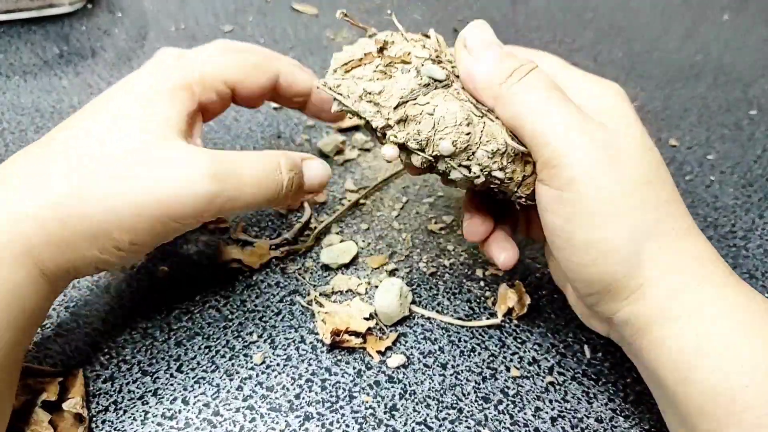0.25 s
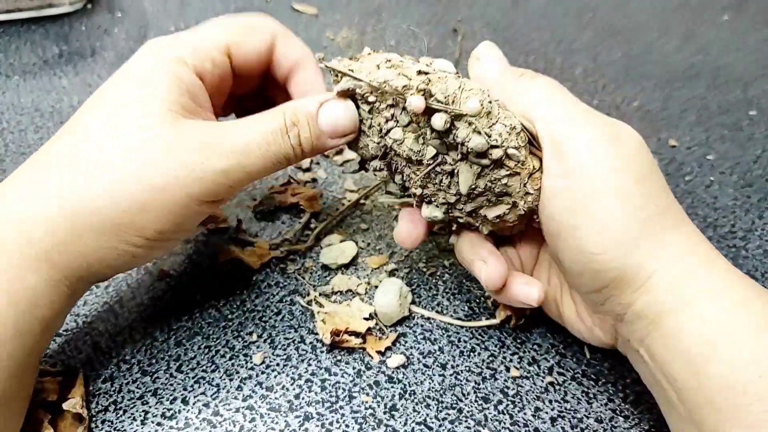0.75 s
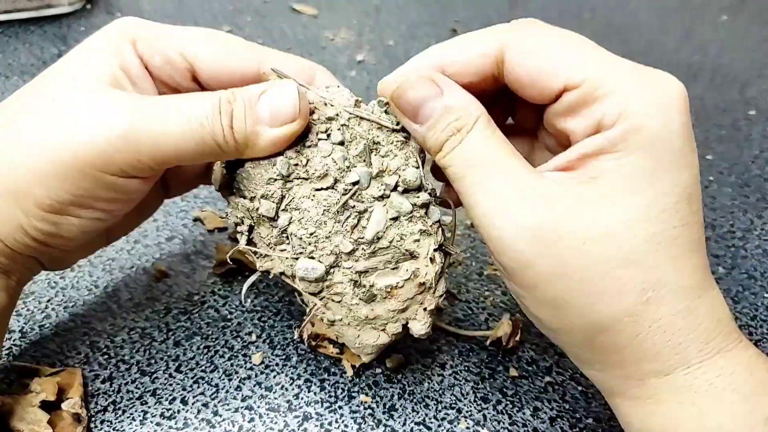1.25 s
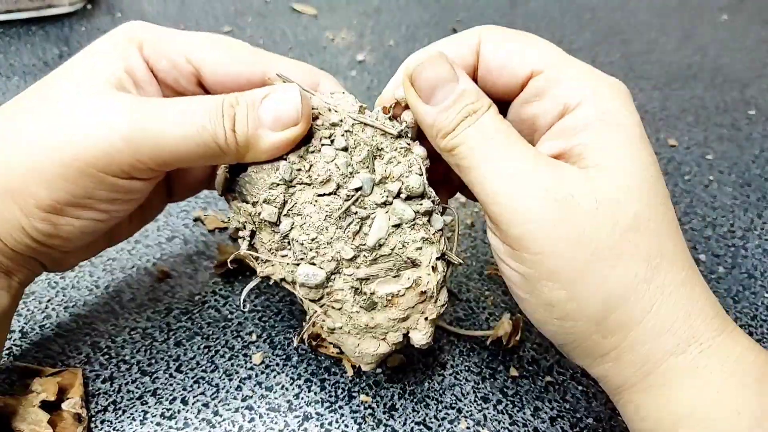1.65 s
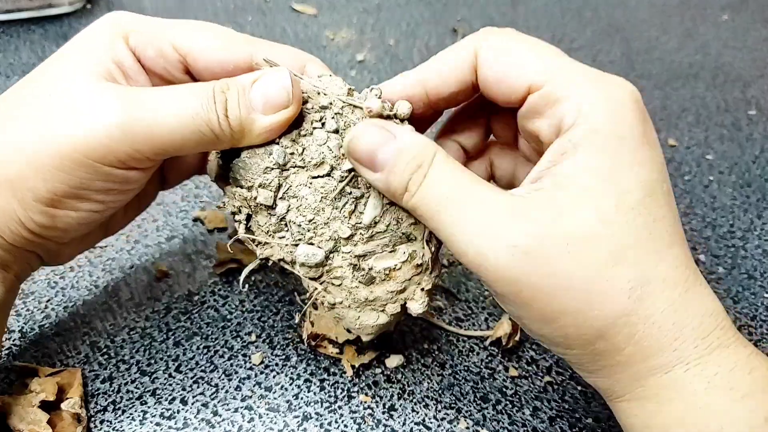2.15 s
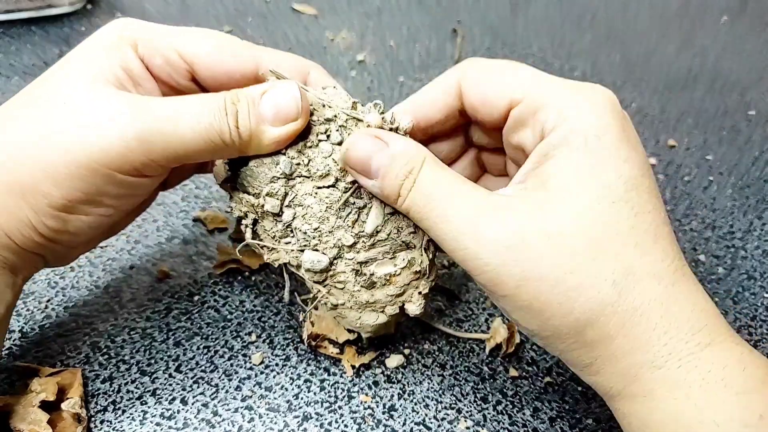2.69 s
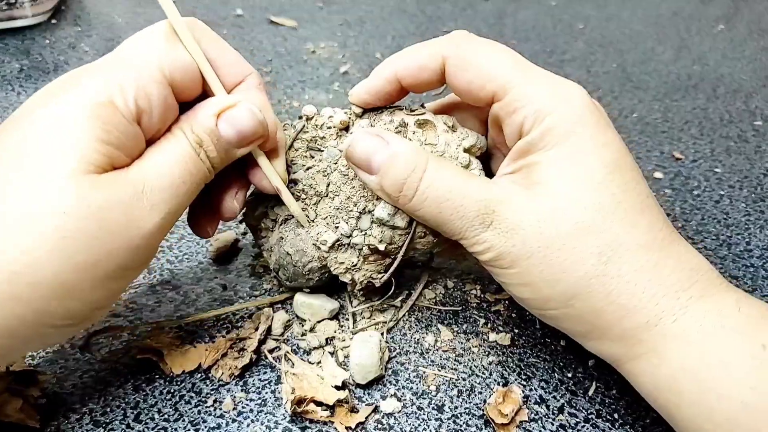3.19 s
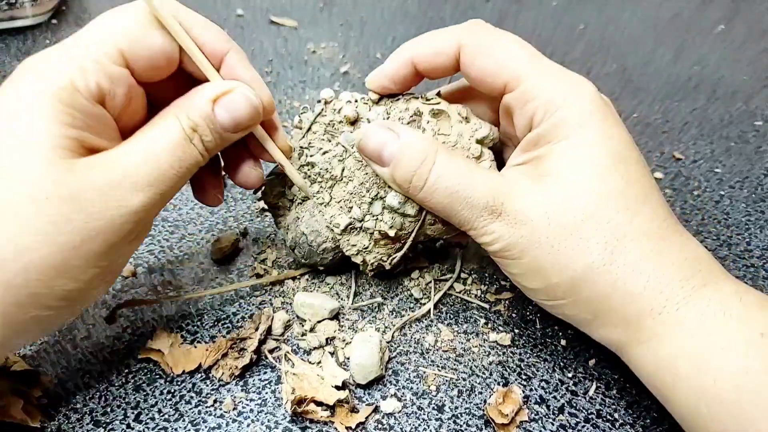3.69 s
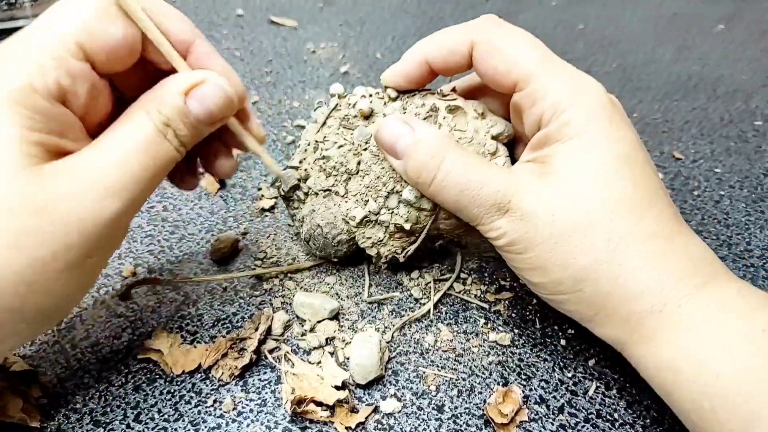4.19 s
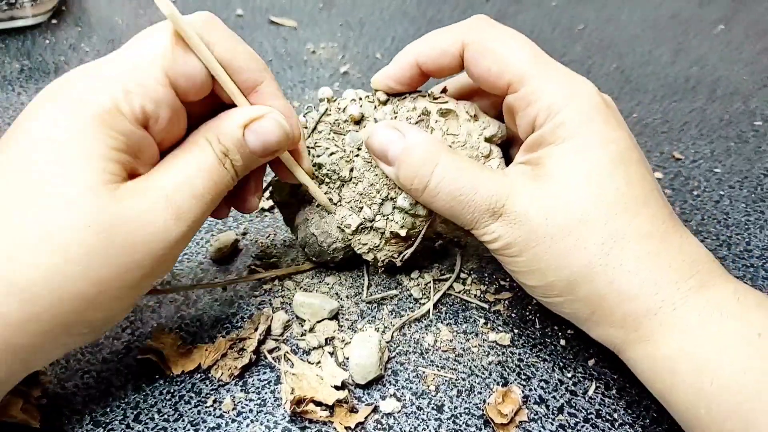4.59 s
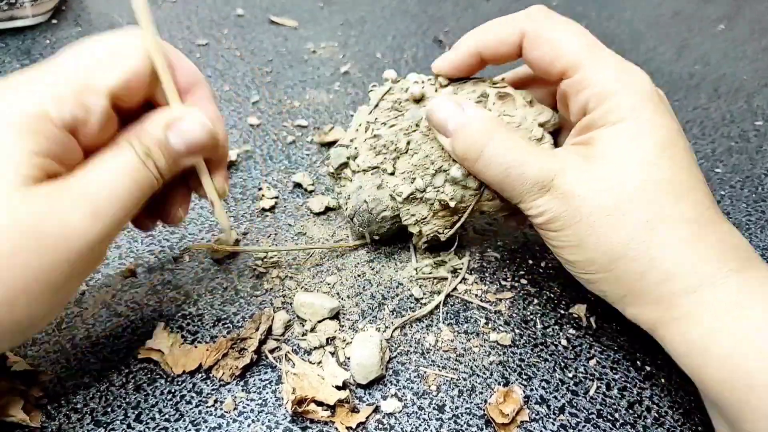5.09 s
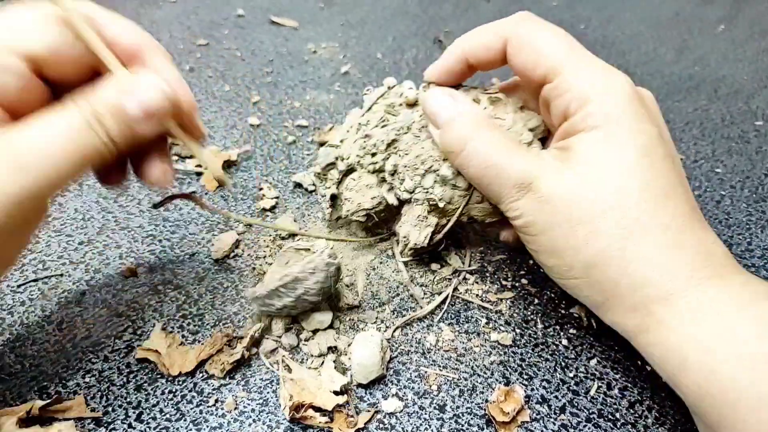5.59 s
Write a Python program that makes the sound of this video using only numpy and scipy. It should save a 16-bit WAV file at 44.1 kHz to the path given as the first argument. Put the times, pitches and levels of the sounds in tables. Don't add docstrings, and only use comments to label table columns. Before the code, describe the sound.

A close stereo phone microphone hears a dried mud lump handled over a table in a quiet, nearly dry room with faint hiss. From 0 to 1.2 s fingertips pick flakes: small, bright, irregular ticks, soft gritty rubbing and a slightly duller crackle near 0.5 s. It is then almost silent, with faint clicks at 1.9 and 2.3 s. At 2.53 s a piece snaps off sharply, crackling and trickling crumbs until 2.9 s, when the sound mutes briefly. A stick pokes from 3.0 s, lightly scraping, with hard cracks and table knocks at 3.33 and, strongest, 4.06 s; weaker pokes follow. A loud bright crack comes at 5.05 s, cut by a short mute at 5.15 s. Around 5.5 s the lump crunches apart in a dense gritty burst with crumbs pouring. After another tiny mute, a loud, slightly clipped low thump hits at 5.73 s, followed by final small cracks and crumbs.

```python
import sys
import numpy as np
from scipy import signal
from scipy.fft import rfft, irfft, next_fast_len
from scipy.io import wavfile
from scipy.ndimage import uniform_filter1d, map_coordinates

SR = 44100
rng = np.random.default_rng(int(sys.argv[2]) if len(sys.argv) > 2 else 0)


def attenuation_scalar(level_db):
    decades = np.asarray(level_db, float) / 20
    return 10 ** decades


def output_pcm(signal):
    pcm = np.clip(np.atleast_2d(signal).T, -1, 1) * 32767
    wavfile.write(sys.argv[1], SR, np.round(pcm).astype(np.int16))


N = 257984

# frequency in Hz, density in dB per Hz.
ROOM_TONE = [(15, -72), (25, -34), (120, -5), (157, -12), (223, -7), (344, -12), (796, -22), (988, -24.5),
             (1480, -23.5), (1940, -30), (5140, -34), (8360, -41), (11300, -38), (16000, -36)]

# peak time in seconds, level in dB, rise and fall in seconds
# per 20 dB, brightness in dB.
RUBS = [(0.074, -58, 0.2, 0.08, 8), (0.2, -58, 0.03, 0.01, 7.5), (0.312, -65.5, 0.37, 0.7, -10.5),
        (0.522, -53.5, -0.07, 0.14, -20), (0.626, -63.5, -0.5, 0.4, -3), (0.81, -65, 1, 0.1, 9),
        (0.915, -52, 0.06, 0.04, -0.5), (1.025, -64, 0, -0.32, 13), (1.19, -68, 1.1, 0.56, 5.5),
        (1.272, -71, .035, 0.5, -1.5), (1.87, -77, 5, -1.5, -12), (1.903, -69.5, 0.15, 0.18, -5.5),
        (2.14, -75, .45, -0.14, -9), (2.295, -54.5, 0.06, 0.03, 4), (2.485, -68, 0.8, 0.6, 0)]
FALLOUT = [
    (2.538, -42, -0.0067, 0.11, -8),
    (2.61, -50.5, 0.0134, 0.02, -20),
    (2.649, -58, 0.01, 0.02, -10),
    (2.735, -58.5, 0.15, 0.2, -7),
    (2.879, -60, -0.27, 0.08, 2.5),
]
SHOWERS = [(3.008, -55, -0.02, -0.1, 1), (3.228, -58.5, 0.2179, 0.14, 2.5), (3.339, -45, -0.02, 0.3, 2),
           (3.409, -50, 0.07, 0.4, -3.5), (3.51, -56, .05, .1, 3), (3.56, -57, 0.2, .03, -5),
           (3.68, -57.5, 0.4, -0.46, -5), (3.895, -70, .01, .02, 2), (3.985, -52, -0.08, 0.03, -13.5),
           (4.05, -72, -1, -0.2, 1.5), (4.072, -52.5, -0.24, 0.16, 4.5), (4.2, -56, 0.19, 0.0759, -19),
           (4.395, -64, -0.02, 0.07, 3), (4.462, -70.5, -0.13, 0, 5), (4.678, -58.5, 0.18, 0.33, -1),
           (5.054, -47.5, -0.0634, 4, -3), (5.1, -55.5, 0.16, 7.5, 4.5), (5.18, -46.5, -3, 0.05, -2.5),
           (5.359, -59, 1.2, 0.07, -8.5), (5.401, -69.5, -6, 0, 0), (5.498, -40.5, .004, 0.22, 3),
           (5.54, -33, 0.03, 0.08, -1), (5.63, -60, 0.2, 4, 4), (5.75, -66, 13, -6, -22.5),
           (5.801, -47, 0.4, .09, -8)]
# frequency in Hz, gain in dB.
FIZZ_COLOUR = [(4000, -38), (5800, -4.5), (7500, -8.5), (9300, -10), (11000, -10), (12000, -3),
               (15400, -9.5), (15900, -69)]
# frequency in Hz, gain in dB.
GRIT_COLOUR = [(1500, -20), (2400, 2), (3600, 1.5), (5000, 0.5), (6500, -22)]
# frequency in Hz, gain in dB.
RUB_COLOUR = [(250, -9), (600, -2.5), (1200, -2), (2000, -2.5), (3500, -36.5)]
DULL_PER_BRIGHT = -0.231
FINGER_DULL_DB, STICK_DULL_DB = -3, 0.4
SHOT_ENDS = [
    1.222,
    2.926,
    5.157,
    5.72,
    9,
]

# start in seconds,
# peak in dB, pitch in Hz, decay t60 in seconds, left re right in dB.
CHIPS = [(.0735, -54, 6860, 0.014, -2), (.1455, -44, 7240, .006, 1), (.154, -52, 7000, .008, 0),
         (0.1987, -37, 4100, 0.01, 0), (.2329, -41, 4510, 0.0083, 0), (0.3315, -39, 1360, 0.0168, -7),
         (.338, -41, 7530, .012, 0), (.356, -50, 7800, .008, -0.5), (.5217, -42, 4760, 0.025, -10),
         (.531, -44, 4900, 0.032, -7.5), (0.545, -33.5, 1598, .012, -15), (.5447, -38, 4830, .01, -8),
         (.6488, -42.5, 3900, 0.0064, -2), (0.7027, -36, 3250, .006, -9.5), (0.7033, -47, 1500, 0.0072, 0),
         (.7597, -48, 5940, 0.0043, -3.5), (.833, -48.5, 1110, 0.032, -3), (0.9153, -46.5, 5770, 0.0046, 4),
         (.9165, -40.5, 2000, .008, 3), (2.592, -36, 1660, 0.023, 0), (2.6068, -34.5, 1660, .02, 0),
         (2.6425, -40.5, 1630, 0.022, 2), (2.672, -38, 1630, 0.011, -2.5), (2.695, -40.5, 1600, 0.017, 3),
         (3.327, -20.5, 3365, 0.007, 5), (3.372, -36, 1290, .02, 2), (3.453, -36, 1191, 0.039, 0),
         (4.0593, -8.5, 1240, 0.0089, 0.5), (4.07, -28, 1000, 0.026, -2), (4.093, -30, 890, 0.029, 1),
         (5.0459, -13.5, 6500, 0.0038, -10), (5.088, -30, 916, 0.044, 1), (5.361, -38, 950, 0.037, 0),
         (5.504, -25, 1020, 0.014, 0), (5.554, -22, 4273, 0.013, -4.5), (5.577, -25.5, 3400, .01, -2),
         (5.595, -39, 6470, 0.0118, -3.5), (5.611, -41.5, 6730, 0.0084, -2),
         (5.6115, -36, 4000, 0.0087, -8), (5.675, -34, 583, 0.062, 2.5),
         (.0335, -44, 6100, 0.0035, 0), (.041, -45, 8500, .004, 5), (.1628, -45, 6300, .006, 0),
         (.171, -49, 7550, .005, 0), (.184, -46, 5900, .005, -3), (.191, -47, 7500, .005, 0),
         (.297, -50, 6500, 0.0045, 0), (.366, -44, 8100, .005, -2.5), (.4672, -43, 2060, 0.0065, -2),
         (0.517, -38, 4400, .004, -8), (.518, -43, 900, 0.007, -3), (.635, -52, 7300, 0.0045, 0),
         (.6492, -41.5, 7420, 0.0038, -4), (.749, -48, 4500, .004, 0), (0.91, -44, 6500, .004, 0),
         (2.593, -34, 4500, .004, 0), (2.607, -36, 5200, .006, -4), (2.643, -40.5, 4020, .005, 0),
         (2.695, -42, 3200, .006, 0), (2.744, -37, 3500, .005, 6), (3.358, -40, 6550, 0.0041, -5),
         (3.37, -39, 7250, 0.0043, 0), (3.39, -36.5, 6300, .006, 0), (3.505, -39, 7260, 0.0053, -2),
         (3.56, -39, 4300, .008, 0.5), (5.493, -24, 7500, 0.0038, -4), (5.528, -24, 5000, .005, -2),
         (5.561, -24, 3270, .006, 0), (5.669, -37, 4840, .01, -8), (2.672, -34, 3000, .004, 0),
         (2.8382, -37, 4300, .005, -6), (2.8768, -36, 7400, .005, 0), (3.6105, -32, 7000, .005, -6),
         (5.535, -17, 4300, .005, -4), (5.81, -36, 5500, .006, 0), (.522, -40, 450, .03, 0),
         (.546, -38, 400, .03, 0), (5.565, -24, 560, .05, 0)]
CHIP_RISE_CYCLES = 0.36

# break time in seconds, peak in dB,
# colour in Hz, left re right in dB.
PICKS = [(0.034, -40, 7000, -17), (0.049, -30.5, 8400, -7), (0.1454, -33, 7530, -11.5),
         (0.1626, -36.5, 7270, 3.5), (0.184, -41, 6760, 3), (0.1975, -25, 8510, -8),
         (0.2333, -28.5, 7400, -4.5), (0.3044, -32.5, 7700, 2), (0.3313, -27.5, 7900, -23),
         (0.3658, -40, 7430, -15.5), (0.418, -35, 5930, 2), (0.4666, -43, 2060, -1.5),
         (0.517, -41, 4500, -11), (0.544, -41, 4450, 1), (0.635, -38, 6840, -13), (0.6494, -40, 7250, -19),
         (0.7596, -40, 6490, -1), (0.7936, -35.5, 8050, -13.5), (0.8827, -28.5, 8100, -5.5),
         (0.9154, -31, 5700, -6.5), (1.019, -41.5, 6740, -21.5), (1.0982, -46, 7040, -15),
         (1.1548, -34.5, 7500, -9), (1.2032, -44, 7600, -9.5), (1.274, -43, 3050, -18),
         (1.9002, -39, 8100, -7), (2.2906, -28, 2330, -8), (2.3979, -44.5, 7750, 4), (2.433, -38, 7500, 5),
         (2.4777, -34, 7400, 4)]
PICK_KNOCK_DB, KNOCK_DB_PER_OCTAVE = -27.5, -1.5
# break time in seconds, peak in dB,
# colour in Hz, left re right in dB, body knock re peak in dB.
BREAK = [(2.528, -12, 5970, 8, -18.5), (2.593, -31, 2480, 11.5, -15), (2.605, -30, 3050, 2, -22),
         (2.644, -48, 4450, -4, -15), (2.674, -30, 2320, 5, -20), (2.695, -48, 2000, -7, 1),
         (2.72, -20.5, 3000, -7, -27.5), (2.743, -34.5, 2350, 10, -19), (2.788, -38.5, 3440, -17.5, -38),
         (2.838, -33.5, 4360, -21, -48), (2.8763, -30, 7400, 4, -42)]
POKES = [(3.0021, -25.5, 4680, -2, -13.5), (3.0746, -30.5, 4370, -2, -15.5), (3.15, -43, 4660, 10, -5.5),
         (3.218, -34, 7580, -16.5, -22), (3.3278, -13.5, 6500, 10.5, -8.5), (3.611, -24.5, 6600, -9, -26),
         (3.6631, -44, 3600, -1, -18), (3.681, -37, 4020, -9.5, -22), (3.893, -44, 6400, -10, -24),
         (3.976, -25.5, 3680, -12.5, -10.5), (4.036, -28, 4630, -8, -15), (4.0596, -12.5, 7150, -0.5, -7.5),
         (4.1469, -34.5, 6860, -10, -10), (4.1792, -36, 2450, 6, -9.5), (4.21, -36.5, 2070, -8, -22),
         (4.392, -43, 4620, -13.5, -8), (4.4576, -38, 4940, -21, -16.5), (4.5475, -47.5, 4400, 10, 5),
         (4.665, -32.5, 5240, -5.5, -7), (4.82, -42.5, 5363, 10, -19)]
LEVERS = [(5.0457, -6, 6760, -3.5, -22), (5.1687, -14.5, 7400, -5, -18), (5.339, -38.5, 4276, -1.5, -9),
          (5.493, -15.5, 6570, -5, -17.5), (5.504, -25.5, 6200, -8, 1), (5.516, -19.5, 7160, 9, -16),
          (5.5325, -11.5, 4800, 3, -22), (5.5596, -15, 4440, -8.5, -15.5), (5.669, -33, 4870, -9, -9),
          (5.7617, -21, 2300, -24, -21), (5.793, -21.5, 5940, 3, -18.5)]
PICK_T60, BREAK_T60, POKE_T60, LEVER_T60 = 0.021, 0.024, 0.015, 0.017
PICK_TEAR, BREAK_TEAR, POKE_TEAR, LEVER_TEAR = 0.33, 0.089, 0.14, 0.06
# frequency in Hz, gain in dB.
CRUST_COLOUR = [(150, -24.5), (1200, -3.5), (2500, 1), (4500, -0.5), (7500, -8), (9500, -10), (11000, -10),
                (12500, -1), (15400, -9), (16900, -45)]

# start in seconds, peak in dB, deep modes re peak in dB,
# long middle mode re peak in dB.
KNOCKS = [(0.068, -39.5, -19.5, -33), (0.417, -45, -21, -18.5), (0.537, -44.5, -16, -12.5),
          (1.266, -53.5, 3.5, -11), (2.527, -30, -33, -22), (3.072, -37, -19, -18.5), (3.15, -38, -11, -14),
          (3.325, -21, -6.5, -25.5), (3.672, -36.5, -9.5, -20.5), (3.969, -33, -21, -20.5),
          (4.033, -32.5, -21.5, -21), (4.06, -15, -2.5, -16.5), (4.089, -18.5, 3.5, -12.5),
          (4.393, -38.5, 2.5, -22), (4.55, -44.5, 3.5, -10.5), (4.668, -34, -7.5, -13.5),
          (4.832, -39.5, -18, -16), (4.986, -43, -20.5, -18), (5.048, -19.5, -3.5, -13),
          (5.085, -22, -18, -13), (5.169, -24, -20.5, -13), (5.352, -36, -42, -12),
          (5.503, -18.5, -30.5, -13), (5.529, -24.5, -22, -4.5), (5.563, -20, -34.5, -17),
          (5.668, -32, -20, -19), (5.7267, -3.6, -4, -26.5), (5.738, -11.1, -9, -24),
          (5.795, -24, 1.5, -10)]
# peak time in seconds, upper modes in dB, rise and fall in seconds
# per 20 dB, deep modes re upper in dB.
PUSHES = [(3.21, -52.5, 0.32, .07, -3.5), (3.352, -42, 0.08, 0.35, -8), (3.48, -56, -0.7, 0.6, -3),
          (3.99, -50, 0.19, -0.43, -2), (4.102, -39, 0.07, 0.085, 16), (4.7, -49, 0.24, 0.36, -1.5),
          (4.841, -45, .04, 0.09, -15.5), (5.365, -47.5, .06, -0.05, -12), (5.19, -40.5, 2.5, 0.1, -26.5),
          (5.4, -57, 0, -0.5, 2), (5.524, -25, 0.025, 0.1, 1), (5.585, -36, .03, .06, -4),
          (3.9, -58, .1, .08, 8), (5.69, -41.5, -0.56, 5, -3)]
# frequency in Hz, level in dB, decay t60 in seconds.
DEEP_MODES = [(130.8, 1, 0.2), (186.8, 0, 0.13)]
# frequency in Hz, level in dB, decay t60 in seconds.
MIDDLE_MODE = [(288.6, -1.5, 0.5)]
# frequency in Hz, level in dB, decay t60 in seconds.
UPPER_MODES = [(417.7, -2, 0.16), (437.7, -2.5, 0.13), (568, -9, 0.12), (888, -14, 0.066)]

# frequency in Hz, decay t60 in seconds.
ROOM_DECAY = [(300, 0.066), (2000, 0.18), (7000, 0.09), (14000, 0.12)]
# frequency in Hz, gain in dB.
LEFT_PORT = [(1000, -3.5), (2400, -0.5), (4400, 0.5), (8000, -10), (15000, -6)]
# start in seconds, end in seconds, gain in dB.
MUTES = [
    (1.215, 1.226, -10),
    (2.921, 2.933, -33),
    (2.937, 2.94, -21.5),
    (5.147, 5.165, -39.5),
    (5.713, 5.726, -41.5),
    (5.745, 5.746, -21),
    (5.746, 5.9, -6),
]
CEILING = 0.96


def unit(x):
    return x / np.sqrt(np.mean(x ** 2) + 1e-20)


def along(points, hz):
    f, v = np.transpose(points)
    return np.interp(np.log(hz + 1), np.log(f + 1), v)


def filtered(x, response):
    m = next_fast_len(x.shape[-1] + 4096)
    return irfft(rfft(x, m) * response(np.fft.rfftfreq(m, 1 / SR)), m)[..., :x.shape[-1]]


def peak(f, centre_hz, width_hz):
    return 1j * f * width_hz / (centre_hz ** 2 - f * f + 1j * f * width_hz)


def gritty(per_second, spread_db, smooth, clump_db):
    hits = (rng.random((2, N)) < per_second / SR) * rng.standard_normal((2, N))
    sizes = attenuation_scalar(spread_db * np.minimum(rng.exponential(size=(2, N)), 2.6))
    clumps = map_coordinates(rng.standard_normal(600), [np.arange(N) * 90 / SR])
    return attenuation_scalar(clump_db * clumps) * (unit(hits * sizes) + smooth * rng.standard_normal((2, N)))


def patchy(x, depth_db):
    z = signal.stft(x, nperseg=256)[2]
    field = uniform_filter1d(rng.standard_normal(z.shape[1:]), size=4, axis=0)
    field = uniform_filter1d(field, size=5, axis=1)
    return signal.istft(z * attenuation_scalar(depth_db * unit(field)), nperseg=256)[1][:, :N]


def swells(rows, lean):
    t = np.arange(0, N / SR, 0.002)
    s, db, rise, fall, tilt_db = np.transpose(rows)[..., None]
    away = np.where(t < s, (s - t) / np.maximum(rise, 0.004), (t - s) / np.maximum(fall, 0.004))
    same_shot = np.searchsorted(SHOT_ENDS, t) == np.searchsorted(SHOT_ENDS, s)
    power = (same_shot * attenuation_scalar(2 * (db + lean * tilt_db - 20 * away))).sum(axis=0)
    return np.interp(np.arange(N) / SR, t, np.sqrt(power))


def room_tone():
    hiss = rng.standard_normal((2, N))
    return attenuation_scalar(-57) * unit(filtered(hiss, lambda f: attenuation_scalar(along(ROOM_TONE, f)) * (f < 15800)))


def crumbs():
    gestures = RUBS + FALLOUT + SHOWERS
    fizz_gain, grit_gain = swells(gestures, 1), swells(gestures, 0)
    rub_gain = attenuation_scalar(FINGER_DULL_DB) * swells(RUBS, 0)
    rub_gain += attenuation_scalar(STICK_DULL_DB) * swells(FALLOUT + SHOWERS, DULL_PER_BRIGHT)
    fall = patchy(gritty(per_second=1800, spread_db=3.0, smooth=1.1, clump_db=1.5), depth_db=2.0)
    drag = patchy(gritty(per_second=900, spread_db=2, smooth=1.0, clump_db=1.6), depth_db=2.4)
    fizz = unit(filtered(fall, lambda f: attenuation_scalar(along(FIZZ_COLOUR, f))))
    grit = unit(filtered(fall, lambda f: attenuation_scalar(along(GRIT_COLOUR, f))))
    dull = unit(filtered(drag, lambda f: attenuation_scalar(along(RUB_COLOUR, f))))
    rub = dull + 0.9 * dull[::-1]
    return attenuation_scalar(-3.5) * fizz_gain * fizz + attenuation_scalar(1.0) * grit_gain * grit + attenuation_scalar(1.0) * rub_gain * rub


def snaps():
    t = np.arange(4096) / SR - 0.003
    out = np.zeros((2, N + 4096))
    picks = [row + (PICK_KNOCK_DB + KNOCK_DB_PER_OCTAVE * np.log2(row[2] / 7000),) for row in PICKS]
    kinds = [(picks, PICK_T60, PICK_TEAR), (BREAK, BREAK_T60, BREAK_TEAR),
             (POKES, POKE_T60, POKE_TEAR), (LEVERS, LEVER_T60, LEVER_TEAR)]
    for rows, t60, lead in kinds:
        for s, db, hz, pan_db, knock_db in rows:
            noise = rng.standard_normal((3, len(t)))
            tear = np.where(t < 0, lead * np.exp(t / 0.0015), 1)
            crack = 0.45 * np.exp(-np.abs(t) / 0.00013)
            shape = tear * (attenuation_scalar(-60 * np.abs(t) / max(t60, 0.002)) + crack)
            burst = (noise[0] + 2.1 * noise[1:]) * shape

            def flake_response(f):
                bright = attenuation_scalar(-0.25 * (db + 20.5) * (f > 9500))
                return attenuation_scalar(along(CRUST_COLOUR, f)) * (0.34 + peak(f, hz, 0.34 * hz)) * bright

            flake = filtered(burst, flake_response)
            knock = filtered(noise[0] * shape ** 1.06, lambda f: peak(f, 1244, 900) ** 3)
            flake *= attenuation_scalar(db - 2.0 + np.array([[0.65 * pan_db], [0]])) / np.abs(flake).max()
            knock *= attenuation_scalar(db + knock_db + 5.5) / np.abs(knock).max()
            out[:, round((s + t[0]) * SR):][:, :len(t)] += flake + knock
    return out[:, :N]


def chips():
    t = np.arange(4096) / SR
    out = np.zeros((2, N + 4096))
    for s, db, hz, t60, pan_db in CHIPS:
        onset = 1 - np.exp(-t * hz / CHIP_RISE_CYCLES)
        tone = attenuation_scalar(-60 * t / max(t60, 0.002)) * onset * np.sin(2 * np.pi * hz * t)
        level = attenuation_scalar(db + np.array([[pan_db], [0]]))
        out[:, round(s * SR):][:, :len(t)] += level * tone / np.abs(tone).max()
    return out[:, :N]


def ring(modes, t, scatter_db):
    return sum(attenuation_scalar(db + scatter_db * rng.normal() - 60 * t / t60) * np.sin(2 * np.pi * hz * t)
               for hz, db, t60 in modes)


def table():
    t = np.arange(SR // 2) / SR
    out = np.zeros(N + SR)
    for s, db, deep_db, middle_db in KNOCKS:
        tone = attenuation_scalar(-6.0) * ring(UPPER_MODES, t, scatter_db=3.0)
        tone += attenuation_scalar(deep_db - 1.5) * ring(DEEP_MODES, t, scatter_db=4.0)
        tone += attenuation_scalar(middle_db + 8.5) * ring(MIDDLE_MODE, t, scatter_db=1.5)
        thud = unit(filtered(rng.standard_normal(len(t)), lambda f: peak(f, 347.4, 377) ** 2))
        tone += attenuation_scalar(-7.0 - 60 * t / 0.053) * thud
        out[round(s * SR):][:len(t)] += attenuation_scalar(db) * tone * (1 - np.exp(-t / 0.0036))
    for lean, modes in ((0.92, DEEP_MODES), (0, UPPER_MODES)):
        body = ring(modes, t, scatter_db=4.5)
        unevenness = unit(gritty(per_second=300, spread_db=1.0, smooth=1.0, clump_db=3.0)[0])
        force = swells(PUSHES, lean) * unevenness
        out[:N] += attenuation_scalar(1.5) * signal.fftconvolve(force, body / np.linalg.norm(body))[:N]
    return out[:N]


def room(x):
    hz, t, z = signal.stft(rng.standard_normal((2, SR // 2)), SR, nperseg=256)
    tail = signal.istft(z * attenuation_scalar(-60 * t / along(ROOM_DECAY, hz)[:, None]), SR, nperseg=256)[1]
    delayed = np.pad(x, ((0, 0), (120, 0)))
    return signal.fftconvolve(delayed, tail / np.linalg.norm(tail[0]), axes=1)[:, :N]


def ports(x):
    def response(f):
        late = np.exp(-2j * np.pi * f * 0.00016)
        return np.array([late * attenuation_scalar(along(LEFT_PORT, f)), 1 + 3.66 * peak(f, 6915, 1090)])

    return filtered(x, response)


def scene():
    cracks, board = snaps() + chips(), table()
    lump = cracks + crumbs() + attenuation_scalar(-16.0) * room(cracks)
    air = attenuation_scalar(-17.5) * room(np.array([board, board])) + room_tone()
    held = patchy(np.array([np.roll(board, 6), board]), depth_db=1.3)
    held[:1] = patchy(held[:1], depth_db=0.8)
    held = filtered(held, lambda f: (1j * f / (55 + 1j * f)) ** 3)
    return ports(lump) + held + air


def thin_treble(x, keep, hole_share):
    hz, t, z = signal.stft(x, SR, nperseg=1024)
    power = np.abs(z) ** 2
    treble = power[:, hz > 2500].sum((0, 1))
    sudden = treble > 2.2 * uniform_filter1d(treble, size=7)
    starved = 1 + 8 * uniform_filter1d(sudden * 1., size=5)
    band = np.abs(uniform_filter1d(power, size=16, axis=1))
    weak = (power < keep * band) & (hz[:, None] > 2500)
    luck = uniform_filter1d(rng.standard_normal((len(hz) // 10 + 1, len(t))), size=3, axis=1)
    luck = np.repeat(unit(luck), 10, axis=0)[:len(hz)]
    risk_points = [(2500, 0.16), (7500, 0.31), (9000, 1.7), (11000, 2.8), (12500, 0.3)]
    risk = hole_share * along(risk_points, hz)[:, None]
    holes = (luck < np.log(risk * starved + 1e-9) / 1.7) & (hz[:, None] > 2000)
    top = hz[:, None] > 15700
    return signal.istft(z * (sudden | ~(weak | holes | top)), SR, nperseg=1024)[1][:, :N]


def top_cut(x):
    return signal.sosfilt(signal.butter(12, 16810, fs=SR, output="sos"), x)


def record(dry):
    t = np.arange(N) / SR
    gate = np.ones(N)
    for start, end, db in MUTES:
        gate[(t > start) & (t < end)] = attenuation_scalar(db)
    since = t - 5.7367
    glitch = attenuation_scalar(-5.0) * (since > 0) * np.exp(-np.abs(since) / 0.000278)
    x = dry * uniform_filter1d(gate, size=31) + glitch
    mix = np.clip(thin_treble(x, keep=0.48, hole_share=0.25), -CEILING, CEILING)
    return top_cut(mix)


dry = scene()
out = record(dry)
output_pcm(out)
```